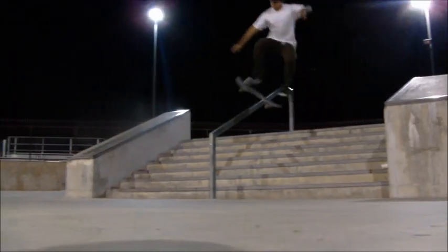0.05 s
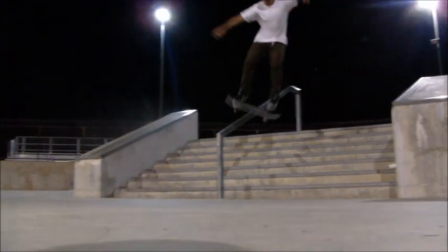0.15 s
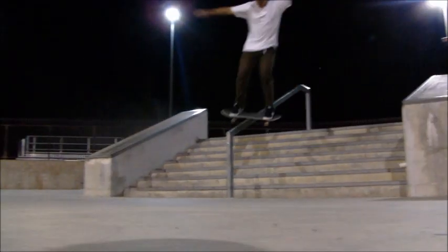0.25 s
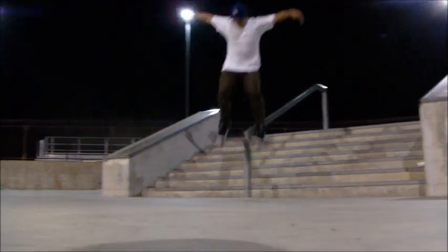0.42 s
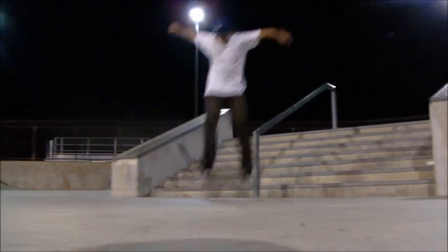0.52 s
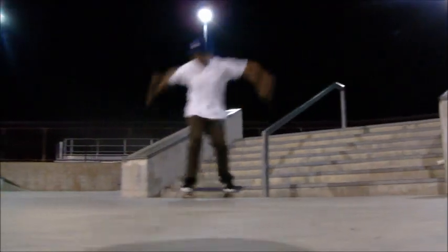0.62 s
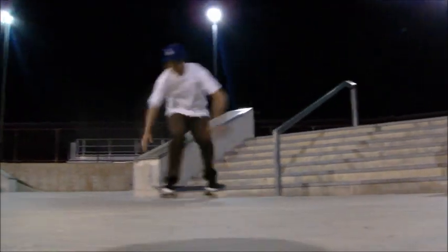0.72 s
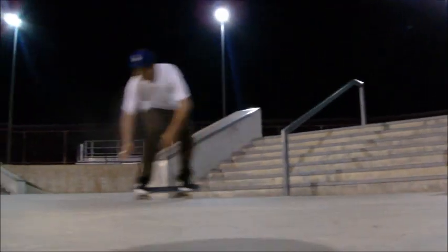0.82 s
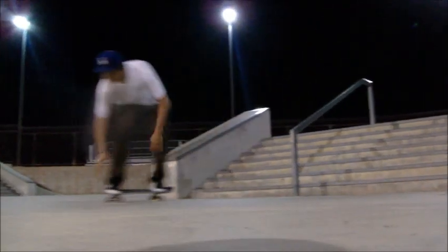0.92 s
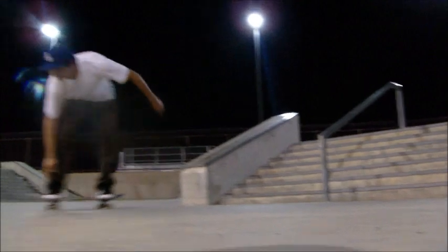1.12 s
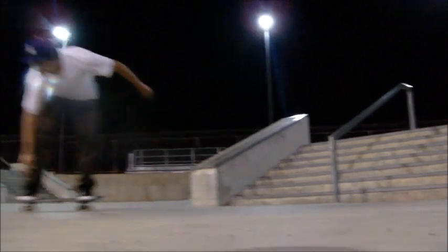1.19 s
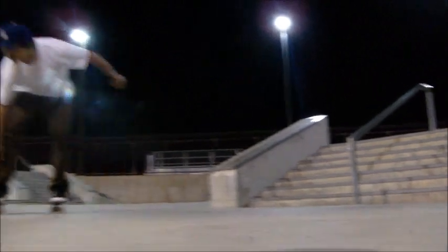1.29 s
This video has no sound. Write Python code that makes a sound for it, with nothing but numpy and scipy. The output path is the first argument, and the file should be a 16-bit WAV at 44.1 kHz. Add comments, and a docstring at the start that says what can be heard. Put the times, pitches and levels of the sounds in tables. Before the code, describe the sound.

In an outdoor skate park, a skateboard rattles and scrapes down a metal rail, lands with a sharp slap, then rolls closer over rough concrete, wheels humming and ticking. A low distant rumble lies underneath.

```python
"""Skateboard off a handrail at night

A skateboard clacks onto a steel handrail, chatters along it and knocks its truck on it, leaving the
rail ringing. After a light tap in the drop it slaps down on concrete and rolls closer on gritty,
humming wheels. The open skate park returns faint scattered echoes over a low distant rumble."""
import sys
import numpy as np
from scipy import signal
from scipy.io import wavfile
from scipy.ndimage import uniform_filter1d

SR = 44100
rng = np.random.default_rng(int(sys.argv[2]) if len(sys.argv) > 2 else 0)


def pcm_store(signal):
    """Save signal as 16-bit PCM."""
    levels = np.round(np.clip(np.atleast_2d(signal), -1, 1) * 32767)
    wavfile.write(sys.argv[1], SR, levels.astype(np.int16).T)


N = 59535
TIME = np.arange(N) / SR

# The ring of a struck wheel. Each row: pitch in Hz, relative level in dB, t60 in seconds.
WHEEL_MODES = [(1002, -13, 0.072), (1151.4, -3.5, 0.078), (1346, -12, 0.066), (1490, -33, 0.055)]
# The tone of a slap on concrete. Each row: frequency in Hz, relative level in dB.
SLAP_SPECTRUM = [(40, -36), (110, -22), (180, -12.5), (320, -3.5), (850, 0), (1800, 5.5), (2500, -1),
                 (3500, -4), (5800, 0.5), (7400, -14), (8500, -4.5), (9700, -4.5), (11000, -20),
                 (13000, -11), (15000, -28)]


def amp(db):
    """Decibels to gain."""
    return 10 ** (np.asarray(db) / 20)


def unit(x):
    """Scales to rms 1."""
    return x / np.sqrt(np.mean(x ** 2) + 1e-20)


def read(points, hz):
    """Reads a table on a log-frequency axis."""
    f, value = np.transpose(points)
    return np.interp(np.log(hz + 1), np.log(f + 1), value)


def add(mix, start_s, sound):
    """Mixes a sound in at its start time."""
    part = mix[round(start_s * SR):][:len(sound)]
    part += sound[:len(part)]


def colour(x, spectrum, tilt=0, size=4096):
    """Minimum-phase EQ of unit energy, tilted in dB per octave above 300 Hz."""
    hz = abs(np.fft.fftfreq(size, 1 / SR))
    octaves = np.log2(np.maximum(hz, 300) / 1000)
    log_gain = np.log(amp(read(spectrum, hz) + tilt * octaves))
    response = np.exp(np.conj(signal.hilbert(log_gain)))
    taps = np.fft.ifft(response).real[:size // 2]
    return signal.fftconvolve(x, taps / np.linalg.norm(taps))[:len(x)]


def fade(t, t60):
    """Exponential decay, 60 dB down after t60 seconds."""
    return np.exp(-np.log(1000) * t / t60)


def ring(modes, rise_s=0.0008):
    """The dying modes of a struck part, alternating in polarity."""
    tones = sum((-1) ** k * amp(db) * fade(TIME, t60) * np.sin(2 * np.pi * hz * TIME)
                for k, (hz, db, t60) in enumerate(modes))
    return tones * (1 - np.exp(-TIME / rise_s))


def burst(spectrum, db, tilt, t60, rise_s=0.0002):
    """A crack: a quickly dying rush of micro-contacts."""
    envelope = fade(TIME, t60) * (1 - np.exp(-TIME / rise_s))
    return amp(db) * colour(rng.choice([-1., 1.], N) * envelope, spectrum, tilt)


def grains(per_s, spread_db):
    """Random clicks of uneven size."""
    size = amp(spread_db * np.minimum(rng.exponential(1, N), 4))
    return unit(size * rng.choice([-1., 1.], N) * (rng.random(N) < per_s / SR))


def flutter(depth_db, hz):
    """A random gain that wavers at up to about the given rate."""
    lowpass = signal.butter(2, hz, fs=SR, output="sos")
    return amp(depth_db * unit(signal.sosfilt(lowpass, rng.standard_normal(N))))


def night_rumble():
    """A steady bed of low, distant noise."""
    # Each row: frequency in Hz, relative level in dB.
    spectrum = [(25, -34), (60, -12), (130, -9), (220, -5), (350, -0.5), (750, 1.5), (1050, -1.5),
                (1400, -8.5), (2000, -15.5), (3000, -21), (6000, -27.5), (15000, -31.5)]
    return amp(-51.5) * unit(colour(rng.standard_normal(N), spectrum))


def park(x, tail_db, near_db=-13, first_s=0.004, tail_rise_s=0.077):
    """Adds quick reflections from the steps, then a faint tail from distant walls and ramps."""
    # How long the tail hangs. Each row: frequency in Hz, t60 in seconds.
    tail_t60 = [(150, 0.92), (1000, 1), (3000, 0.79), (6000, 0.85), (14000, 0.92)]
    # The tail's tone. Each row: frequency in Hz, relative level in dB.
    tail_spectrum = [(100, 4), (400, -1.5), (1000, 0.5), (3000, 5.5), (5100, 0.5), (7000, 5.5), (9500, 7),
                     (14000, 5)]
    reflections = rng.standard_normal(N) * (rng.random(N) < 2000 / SR)
    near = reflections * (TIME > first_s) * fade(TIME, t60=0.062)
    hz, t, bands = signal.stft(rng.standard_normal(N), SR, nperseg=256)
    bands *= fade(t, read(tail_t60, hz)[:, None])
    tail = signal.istft(bands, SR, nperseg=256)[1][:N]
    tail = colour(tail * (1 - np.exp(-TIME / tail_rise_s)), tail_spectrum)
    echoes = amp(near_db) * near / np.linalg.norm(near) + amp(tail_db) * tail / np.linalg.norm(tail)
    return x + signal.fftconvolve(x, echoes)[:N]


def rolling():
    """Rough concrete shakes the deck, rings the wheels and crackles under them."""
    # The fader moves. Each row: time in seconds, then deck rumble, wheel hum and grit levels in dB.
    faders = [(.66, -43.5, -54, -71), (.79, -41.5, -71, -57.5), (0.832, -41, -45, -42.5),
              (0.872, -43.5, -44.5, -54.5), (0.927, -45, -46.5, -45.5), (.975, -48, -50, -49),
              (1.031, -47, -38.5, -41.5), (1.074, -41, -34.5, -43.5), (1.11, -42, -41, -45),
              (1.18, -38, -39, -43), (1.27, -41, -48, -45.5), (1.35, -37.5, -44, -42)]
    # The tones of the deck's rumble and of the grit. Each row: frequency in Hz, relative level in dB.
    rumble_spectrum = [(40, -46), (130, -27), (230, -13), (360, -2.5), (500, 2.5), (660, 0), (850, -5.5),
                       (1300, -3.5), (1900, -8.5), (2600, -19.5), (5000, -21), (15000, -57)]
    grit_spectrum = [(150, -44), (1000, -9.5), (2000, -4), (2750, -11.5), (3640, -7), (4180, -9),
                     (5000, -4.5), (6000, -11.5), (7600, -11), (9000, -5), (10500, -15), (12000, -9.5),
                     (15500, -20)]
    # Wheel hum and deck drone. Each row: pitch in Hz, relative level in dB, t60 in seconds.
    hum_modes = [(1142, -0.5, 0.019), (1326, -1, 0.014)]
    drone_modes = [(659, 0, 0.028)]
    times, *levels = np.transpose(faders)
    rumble_gain, hum_gain, grit_gain = (amp(np.interp(TIME, times, db)) * (TIME > times[0])
                                        for db in levels)
    rumble = unit(colour(grains(per_s=2500, spread_db=2.5), rumble_spectrum))
    hum = unit(signal.fftconvolve(grains(per_s=590, spread_db=1.7), ring(hum_modes))[:N])
    crackle = grains(per_s=6000, spread_db=2.5) * flutter(depth_db=2.0, hz=160)
    grit = unit(colour(crackle, grit_spectrum))
    drone = unit(signal.fftconvolve(grains(per_s=2500, spread_db=2.0), ring(drone_modes))[:N])
    nearing = np.interp(TIME, [1.17, 1.24], [0, amp(-40)])  # the drone swells as the board comes close
    return rumble_gain * rumble + hum_gain * hum + grit_gain * grit + nearing * drone


def seam_bumps():
    """Each seam or pit ticks and gives the wheels a short ring, damped by the rider's weight."""
    # Each row: start in seconds, wheel ring level in dB, tick level in dB.
    seams = [(.986, -24.5, -46), (1.0058, -28, -62), (1.020, -24, -57), (1.0286, -25, -35),
             (1.0431, -18.5, -33), (1.0595, -20.5, -45), (1.069, -29, -50), (1.101, -30.5, -37.5)]
    damped_ring = ring(WHEEL_MODES) * fade(TIME, t60=0.068)
    out = np.zeros(N)
    for start, ring_db, tick_db in seams:
        tick = burst(SLAP_SPECTRUM, tick_db, tilt=0, t60=0.015)
        add(out, start, tick + amp(ring_db) * damped_ring)
    return out


def landing():
    """A light tap in the drop, then wheels and deck slap down in quick succession and ring briefly."""
    # Each row: start in seconds, slap level in dB, brightness in dB per octave, slap t60 in seconds,
    # deck ring level in dB, wheel ring level in dB.
    hits = [(.489, -36.5, -6.5, 0.13, -46, -54), (.500, -29, -2, 0.043, -29, -24),
            (0.513, -39, 2, 0.088, -43, -31), (.6366, -1.5, 2, 0.017, -16.5, -37),
            (.6395, -11.5, 2, 0.023, -19.5, -10), (0.6451, -10.5, -0.5, 0.023, -13, -23.5),
            (0.6498, -17, -4, 0.066, -23, -5.5), (.657, -21.5, -6, 0.064, -24, -35),
            (.677, -33, -6, 0.033, -35, -37)]
    # The deck's ring on the ground. Each row: pitch in Hz, relative level in dB, t60 in seconds.
    deck_modes = [(353, -7, 0.059), (448, -5, 0.07), (506, -4, 0.11), (726, -9, 0.097), (1385, -3, 0.019),
                  (1944, 5, 0.023)]
    out = np.zeros(N)
    for start, db, tilt, t60, deck_db, wheel_db in hits:
        slap = burst(SLAP_SPECTRUM, db, tilt, t60, rise_s=0.00084)
        add(out, start, slap + amp(deck_db) * ring(deck_modes) + amp(wheel_db) * ring(WHEEL_MODES))
    return out


def singing_rail(knock_s=0.309):
    """The hardest knock sets the steel tube singing, on after the board has left it."""
    # Each row: pitch in Hz, level in dB, t60 in seconds.
    tube_modes = [(2149, -42, 2.1), (2923, -51, .35), (5440, -43, .33)]
    out = np.zeros(N)
    add(out, knock_s, ring(tube_modes))
    return out


def rail_slide(from_s=0.25, to_s=0.338):
    """Each blow cracks and rings steel and deck; between blows the board scrapes along."""
    # Each row: start in seconds, crack level in dB, brightness in dB per octave, crack t60 in seconds,
    # steel ring level in dB, deck ring level in dB.
    hits = [(0.2365, -19.5, 0.5, 0.058, -20.5, -25.5), (0.2415, -25, 2, 0.05, -47, -13.5),
            (0.251, -24.5, 0, 0.12, -33, -38), (0.2698, -18.5, -3, 0.046, -24, -33),
            (0.2884, -15.5, 0, 0.041, -32, -22), (.2945, -21.5, -1.5, 0.12, -19, -25),
            (.3088, -5, 5, 0.011, -2, -21.5), (.322, -11.5, 3, 0.021, -33, -48),
            (0.334, -31, 2.5, 0.071, -20.5, -27)]
    # The tone of board against rail. Each row: frequency in Hz, relative level in dB.
    crack_spectrum = [(40, -40), (110, -25.5), (190, -16), (300, -5.5), (700, -2), (1100, 3.5),
                      (2100, -0.5), (3200, -6), (5300, -8.5), (6300, -17.5), (7700, -20.5), (9000, -20),
                      (11000, -31.5), (15000, -36)]
    # Steel clank and deck knock. Each row: pitch in Hz, relative level in dB, t60 in seconds.
    steel_modes = [(810, -15, 0.037), (1029, -3.5, 0.044), (1192, -8, 0.036), (1277, -14, 0.063),
                   (1770, -28, 0.016), (1990, -12.5, 0.036), (2566, -14, 0.032), (3030, -11.5, 0.026),
                   (3820, -10, 0.02), (4320, -9, 0.027), (5144, 2.5, 0.011)]
    deck_modes = [(296, -13, 0.093), (406.8, -1.5, 0.098), (500, -20, 0.026), (982, -2, 0.12),
                  (1530, -28, 0.073), (2560, -12, .025)]
    blows = np.zeros(N)
    for start, db, tilt, t60, steel_db, deck_db in hits:
        crack = burst(crack_spectrum, db, tilt, t60)
        add(blows, start, crack + amp(steel_db) * ring(steel_modes) + amp(deck_db) * ring(deck_modes))
    contact = (TIME > from_s) * fade(np.maximum(TIME - to_s, 0), t60=0.12)
    scrape = colour(contact * grains(per_s=1300, spread_db=2.5), crack_spectrum, tilt=-1.62)
    return blows + amp(-25) * scrape


def scene():
    """The board in the park, over the night's rumble, in mono."""
    night = night_rumble()
    ground = landing() + rolling() + seam_bumps()
    rail = park(rail_slide(), tail_db=-18.5)  # farther off and higher up, so it echoes more
    return (rail + singing_rail() + park(ground, tail_db=-28.5) + night)[None]


def record(dry):
    """Gain control ducks after loud blows, the hardest peaks clip, then a narrow notch and a high cut."""
    threshold_db, duck_share, smoothing_s, release_db_per_s = -23.5, 0.11, 0.0063, 43
    power_db = 10 * np.log10(abs(uniform_filter1d(dry[0] ** 2, size=300)) + 1e-12)
    fall_db = TIME * release_db_per_s
    peak_db = np.maximum.accumulate(power_db + fall_db) - fall_db  # catches each peak, then sinks
    over_db = np.maximum(peak_db - threshold_db, 0)
    pole = np.exp(-1 / (smoothing_s * SR))
    duck_db = duck_share * signal.lfilter([1 - pole], [1, -pole], over_db)
    clipped = np.clip(dry / amp(duck_db), -1, 1)
    notched = signal.lfilter(*signal.iirnotch(7900, Q=50, fs=SR), clipped)
    high_cut = signal.firwin(255, cutoff=15350, window=("kaiser", 9), fs=SR)
    return signal.oaconvolve(notched, high_cut[None], "same")


dry = scene()
out = record(dry)
pcm_store(out)
```